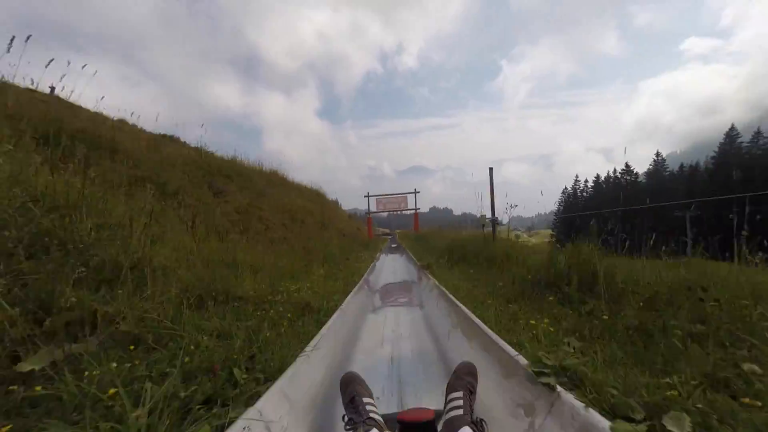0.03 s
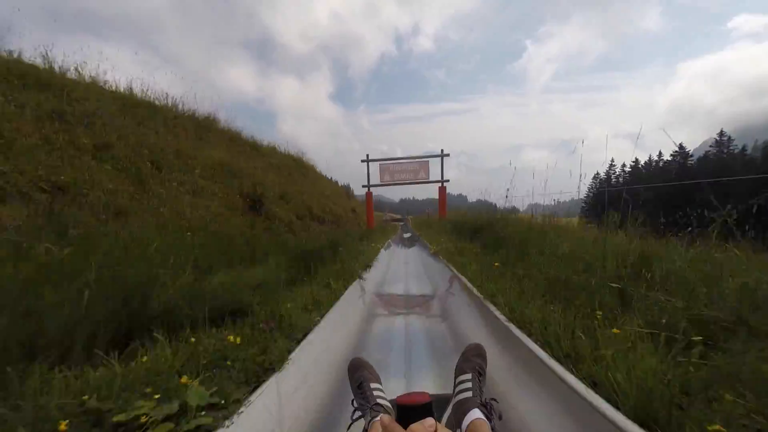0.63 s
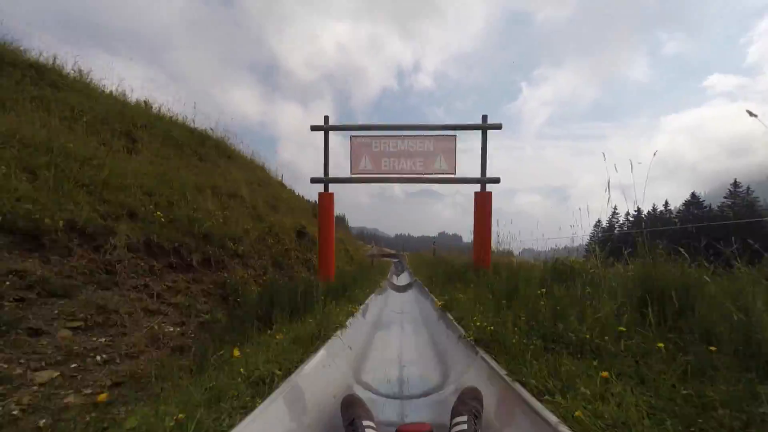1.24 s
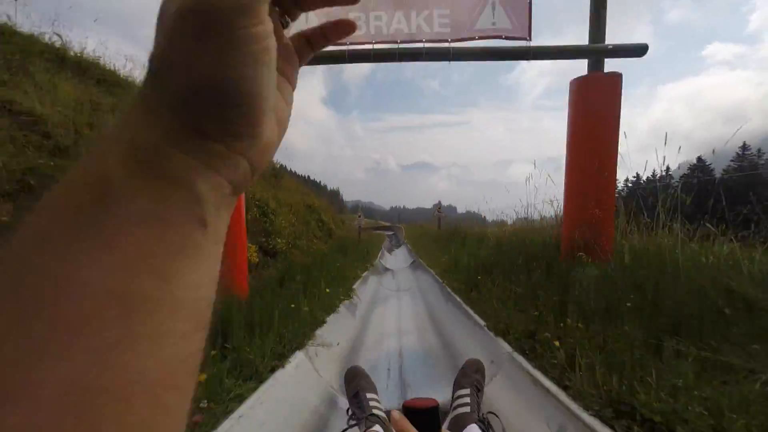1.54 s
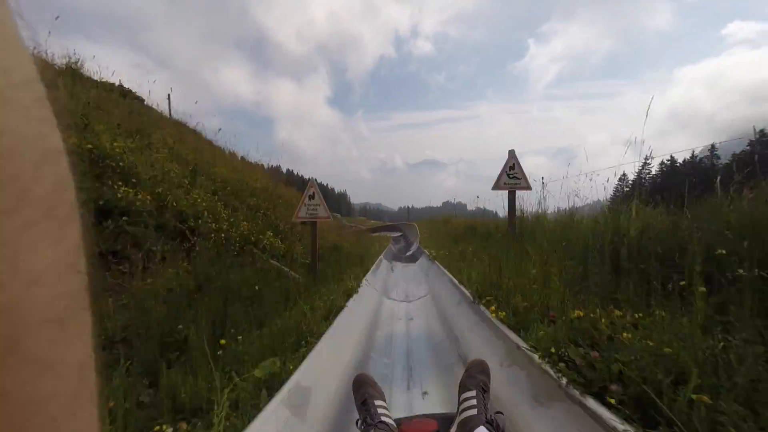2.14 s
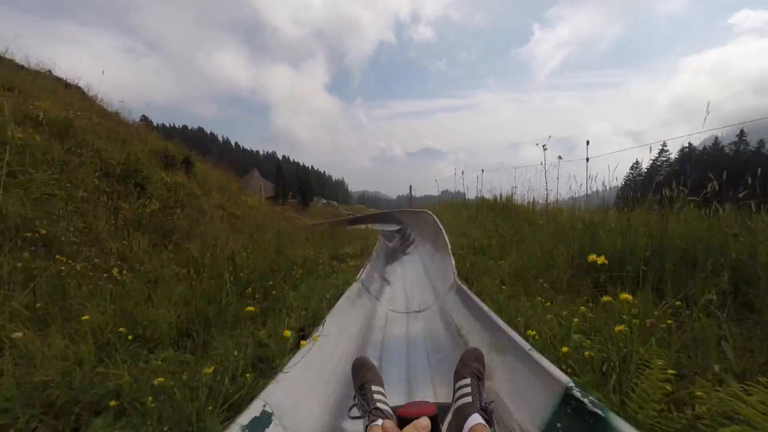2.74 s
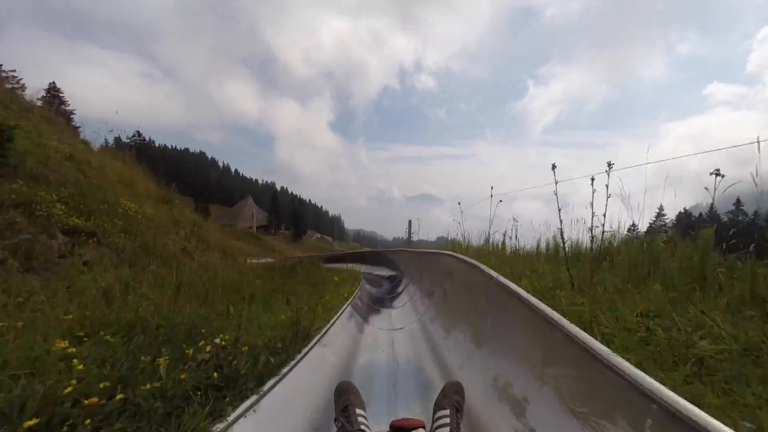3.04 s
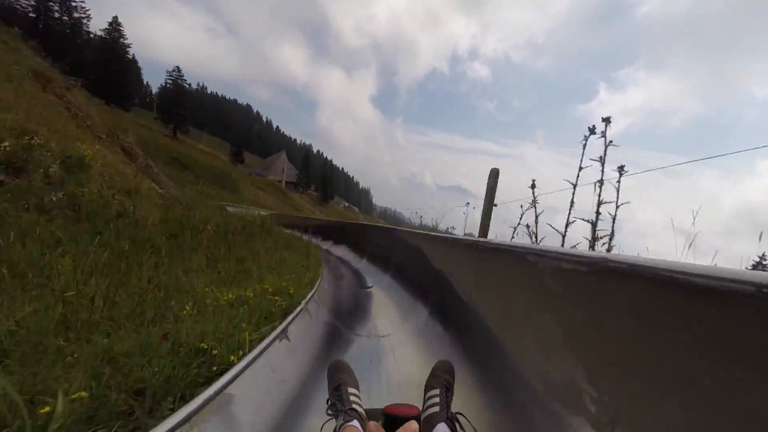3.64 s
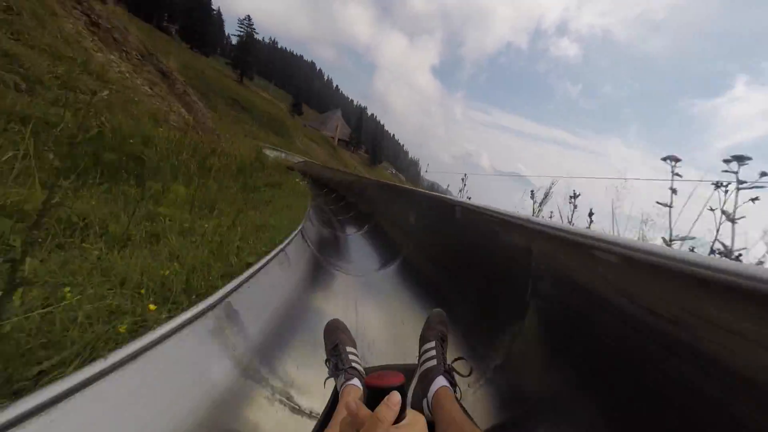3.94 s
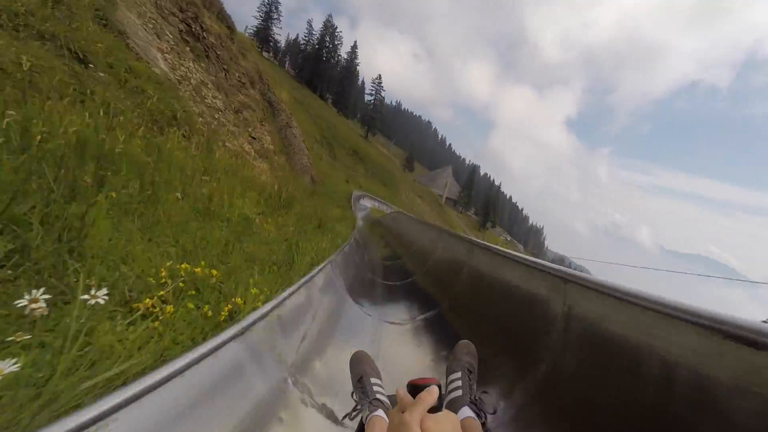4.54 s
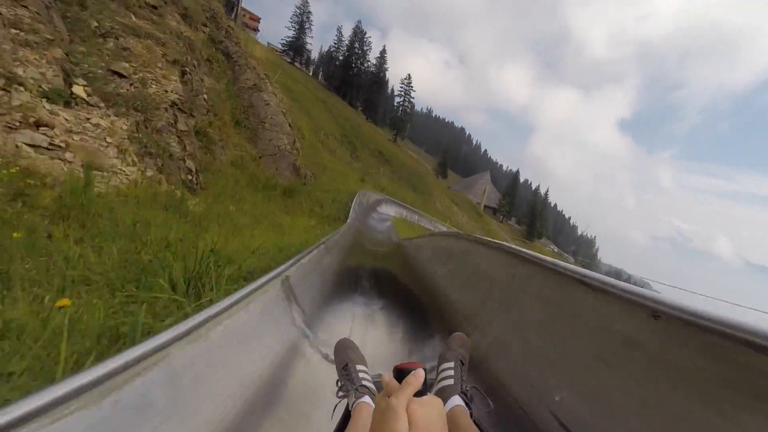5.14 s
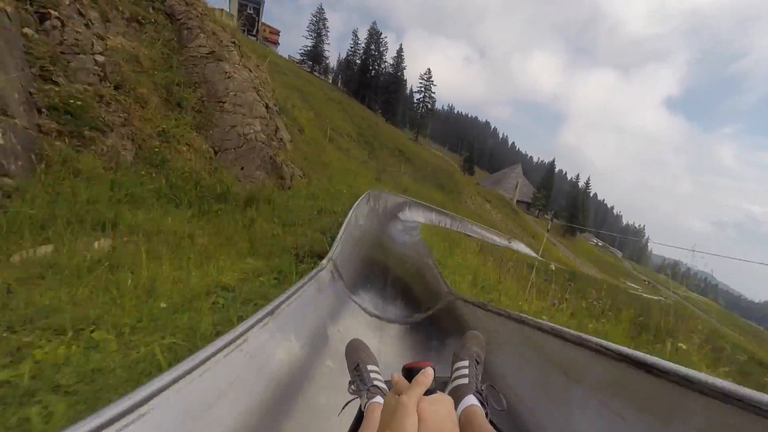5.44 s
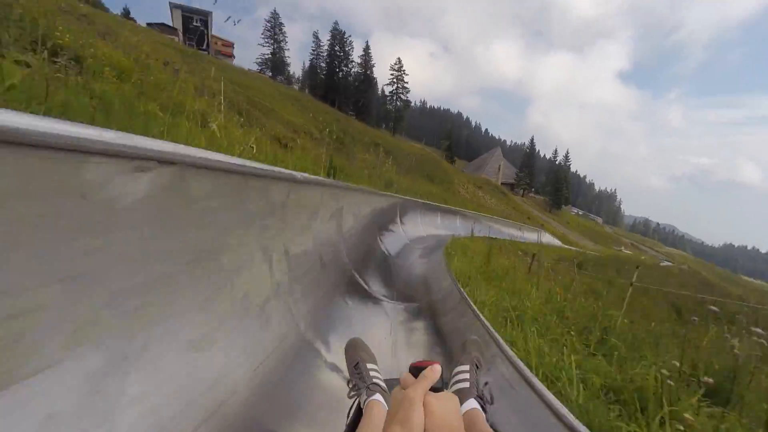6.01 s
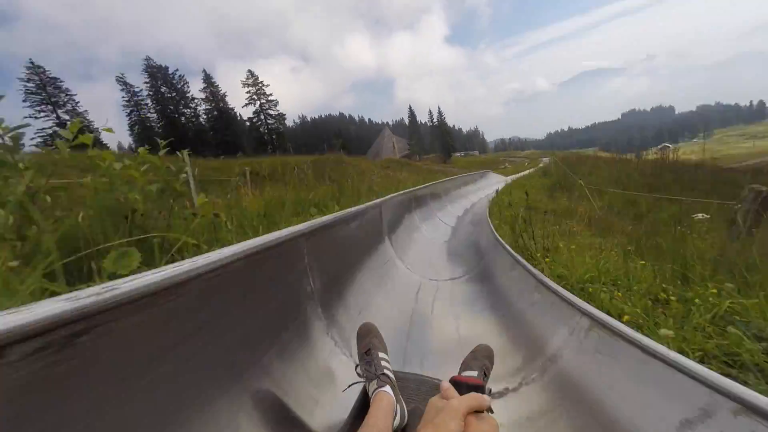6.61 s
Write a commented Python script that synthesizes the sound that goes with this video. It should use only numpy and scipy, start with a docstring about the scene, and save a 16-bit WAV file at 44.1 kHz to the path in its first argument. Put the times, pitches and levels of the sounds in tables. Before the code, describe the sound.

A jolt opens straight into the roar of a sled's wheels on a sheet steel trough, heard close from the rider's seat in open air. A deep rumble and gritty hiss continue at a fairly even level throughout. For the first three seconds the wheels knock over joints about four times a second, slowing slightly after two seconds. Each bump brings a low thump, often with a hollow clack, and hard jolts rattle loose parts at about 0.3, 1, 1.3, 2.1 and 2.9 seconds. Small metal clinks and pings are scattered among them. From about 3.5 seconds the bumps become irregular as the sled lurches through curves. Faint, thin scrapes and short chattering skids come between 3.9 and 4.9 seconds. A sharper skid with a metallic ping hits at 5.8 seconds, followed by more clacks and a bright scrape near 6.7 seconds, with the sled still rolling.

```python
"""A jolt and the roar of wheels on sheet steel: a sled runs down a trough, heard from the rider's seat.
The wheels knock over the joints, about four a second at first; each bump rocks the sled on its mounts,
and hard jolts rattle loose parts. It brakes, then lurches through banked curves where the wheels
scrape and chatter and the hollow shell clacks."""
import sys
import numpy as np
from scipy import signal
from scipy.fft import rfft, irfft, next_fast_len
from scipy.io import wavfile
from scipy.ndimage import uniform_filter1d

SR = 44100
rng = np.random.default_rng(int(sys.argv[2]) if len(sys.argv) > 2 else 0)


def unload_audio(sound):
    """Save the sound as a 16-bit wav file, at the path given as the first command line argument."""
    columns = np.transpose(np.atleast_2d(sound))
    # keep every value between -1 and 1, then stretch to whole-number steps
    steps = np.round(np.clip(columns, -1, 1) * 32767)
    wavfile.write(sys.argv[1], SR, steps.astype(np.int16))


N = 298557
TIME_S = np.arange(N) / SR

# steady contact, before each layer's trim: (time [s], roar [dB], grinding hiss [dB], shaking [dB])
ROLLING_LEVELS = [(0.0, -36, -41.5, -33), (0.38, -35, -42.5, -25.5), (0.75, -37.5, -42, -33.5),
                  (1.34, -36, -42, -29), (2.34, -35.5, -42, -31), (2.94, -35.5, -42, -28.5),
                  (3.45, -37.5, -44, -36), (3.69, -33.5, -39.5, -33.5), (4.03, -36, -43.5, -30),
                  (4.51, -35.5, -40, -29.5), (5.26, -34.5, -41, -31), (5.9, -35.5, -41.5, -31),
                  (6.35, -32, -40, -28), (6.77, -37, -41, -27.5)]
# braking run, sets the front-to-rear delay: (time [s], speed [m/s])
SLED_SPEED = [(0, 8.56), (2.0, 7.7), (2.22, 6.2), (2.5, 6.66), (3.05, 6.26), (3.5, 6.3), (4.8, 5.28),
              (6.77, 4.45)]
# trough joints: (time [s], front thud [dB], front tick [dB],
# rear rocking [Hz], rear rocking [dB], rear punch [dB])
TROUGH_JOINTS = [(0.18, -29.5, -51, 46, -22.5, -19), (0.433, -31, -54, 54.2, -19.5, -28),
                 (0.68, -33, -55, 53.7, -18.5, -17.5), (0.944, -29.5, -45.5, 51.4, -18, -19),
                 (1.2, -33, -53, 52.53, -19.5, -17.5), (1.45, -33.5, -46.5, 64.6, -17, -22),
                 (1.712, -33.5, -50.5, 43.6, -19, -19), (1.974, -29.5, -40.5, 50, -19.5, -23.5),
                 (2.215, -33, -60, 44.3, -19, -30), (2.506, -27, -45, 46.4, -18, -29.5),
                 (2.774, -31, -44.5, 46.8, -16.5, -31), (3.04, -33, -45, 54, -26.5, -31.5),
                 (3.52, -36.5, -48, 46, -21.5, -30), (3.747, -38.5, -49.5, 32.7, -20, -32),
                 (4.074, -34.5, -56, 59.4, -32, -38), (4.424, -32.5, -53, 54.7, -22, -58),
                 (4.813, -30.5, -56, 55, -24.5, -34), (5.182, -35.5, -43, 74, -28.5, -25),
                 (6.079, -46, -62, 34.8, -40, -24.5), (6.166, -31.5, -43, 60.1, -24, -29),
                 (6.328, -43, -43, 51.4, -24, -47), (6.586, -31.5, -49, 51.5, -43, -30)]
# landings from hops after fast joints: (time [s], rocking [dB])
HOP_LANDINGS = [(0.327, -16.5), (0.795, -19), (1.09, -18.5), (1.344, -20.5), (1.557, -17), (1.828, -20),
                (2.109, -25), (2.888, -20.5), (3.175, -22.5)]
# low thumps with a brief rattle, from rebounds on the straight and lurches in the curves:
# (time [s], rocking [Hz], rocking [dB], punch [dB], rattle [dB])
SLED_JOLTS = [(0, 54.5, -18, -22.5, -36.5), (0.077, 62.2, -49, -38, -44), (0.528, 58.6, -20.5, -20, -66),
              (2.351, 49, -15, -29, -54), (3.487, 55.4, -24.5, -28.5, -54), (3.534, 54.3, -21, -49, -46),
              (3.647, 46, -29, -39, -54), (3.714, 37, -18.5, -35, -54), (3.88, 52.5, -19.5, -42, -52),
              (4.001, 50, -22, -33, -75), (4.222, 58, -25, -44, -69), (4.339, 51.6, -26.5, -34, -41),
              (4.661, 65, -25.5, -39, -40.5), (4.7, 45, -21.5, -38, -52), (4.813, 49, -23.5, -25, -44),
              (4.933, 58, -33, -28, -44.5), (5.155, 40.75, -24.5, -29, -66), (5.045, 62, -23.5, -28, -48),
              (5.322, 76.4, -28, -27, -45.5), (5.403, 45.1, -40, -24.5, -47.5),
              (5.446, 62.6, -28.5, -30, -49), (5.773, 56.6, -22, -22.5, -41), (5.84, 53.7, -31, -36, -53),
              (5.964, 53.7, -36, -34, -45), (6.131, 64.4, -28, -26.5, -53), (6.309, 55.05, -28, -35, -51),
              (6.369, 66, -38, -20, -44.5), (6.392, 59.3, -27, -33, -52), (6.71, 54.96, -44, -22.5, -43.5),
              (6.743, 53.6, -39, -41, -43.5)]
# loose parts after hard jolts: (time [s], length [s], body [dB], jingle [dB])
HARD_RATTLES = [(0.276, 0.039, -26, -32.5), (1.033, 0.021, -26, -34.5), (1.075, 0.015, -28, -42),
                (1.288, 0.032, -37, -38), (1.322, 0.021, -28, -35.5), (1.548, 0.029, -30.5, -35),
                (1.79, 0.024, -28, -39), (2.072, 0.03, -25, -30.5), (2.603, 0.03, -32.5, -41.5),
                (2.878, 0.04, -27.5, -36.5), (2.923, 0.013, -31.5, -40), (3.543, 0.016, -36, -34.5),
                (4.525, 0.024, -33, -45), (4.91, 0.046, -43.5, -42), (6.26, 0.062, -33, -39)]
# shell slams down or into the wall: (time [s], pitch [Hz], hollow ring [dB], click [dB])
SHELL_CLACKS = [(0.185, 516, -33, -52), (0.675, 523.5, -28, -41), (0.277, 750, -23, -31),
                (0.312, 776, -23.5, -33), (1.036, 650, -26, -42), (1.078, 756, -22, -36.5),
                (1.276, 480, -25, -39), (1.294, 730, -21.5, -37.5), (1.795, 830, -27, -34.5),
                (2.089, 607, -24.5, -40), (2.216, 610, -27, -45), (2.509, 375, -27, -43),
                (2.881, 457, -23, -36.5), (2.903, 720, -21.5, -40), (3.04, 874, -22.5, -45),
                (3.068, 890, -35, -58), (3.18, 500, -29, -38.5), (3.518, 798, -25, -40.5),
                (3.625, 600, -34, -38.5), (3.751, 510, -27, -44), (4.074, 630, -27, -58),
                (4.198, 1000, -27.5, -48), (4.368, 876, -29, -54), (4.428, 487, -23, -50),
                (4.71, 1300, -32.5, -37.5), (4.81, 504, -22, -40), (4.838, 1160, -32, -53),
                (5.184, 607, -27.5, -39), (5.456, 610, -31.5, -37), (5.832, 1140, -31, -30),
                (6.084, 970, -31, -39), (6.167, 530, -23, -35), (6.287, 560, -25, -37),
                (6.331, 570, -33, -36), (6.4, 894, -23.5, -35.5), (6.593, 970, -27, -36),
                (6.716, 800, -29, -57), (6.751, 1610, -29.5, -40)]
# small fitting hits the frame: (time [s], snap [dB], ring [dB])
FITTING_CLINKS = [(1.697, -49, -59), (1.792, -38.5, -55), (1.981, -37, -56), (2.098, -32, -57),
                  (2.507, -38, -47), (3.042, -37, -55), (3.623, -38.5, -60), (3.802, -38.5, -67),
                  (5.062, -35, -72), (5.303, -35.5, -57), (6.178, -45, -54)]
# brief metal rings and squeaks: (time [s], pitch [Hz], t60 [s], level [dB])
METAL_PINGS = [(1.568, 4240, 0.22, -59), (2.099, 4380, 0.28, -53), (2.523, 1690, 0.13, -39),
               (2.777, 2390, 0.068, -44), (3.041, 1380, 0.033, -39), (3.269, 2020, 0.014, -45.5),
               (3.626, 2400, 0.037, -43.5), (4.011, 2330, 0.26, -53), (4.197, 1242, 0.022, -46),
               (5.792, 2308, 0.034, -40), (5.832, 1410, 0.026, -38), (5.836, 4400, 0.051, -42)]
# sideways wheel slips: (time [s], length [s], slip rate [Hz], level [dB])
WHEEL_SKIDS = [(4.187, 0.033, 470, -43.5), (4.35, 0.067, 600, -46), (4.578, 0.02, 450, -38.5),
               (5.819, 0.033, 580, -34)]
# rims on steel: (time [s], length [s], band centre [Hz], level [dB])
RIM_SCRAPES = [(0.473, 0.052, 6800, -54.5), (2.218, 0.039, 6400, -55), (3.171, 0.077, 6000, -52.5),
               (3.871, 0.2, 6400, -60.5), (4.158, 0.05, 5800, -53), (4.267, 0.14, 6300, -62),
               (4.41, 0.24, 6450, -60), (4.666, 0.12, 6660, -59), (4.794, 0.12, 6640, -60.5),
               (6.125, 0.13, 5500, -53), (6.729, 0.13, 6000, -45)]

# shell and wheel resonances, negative lift is a notch: (centre [Hz], width [Hz], lift [dB])
SLED_MODES = [(491, 190, 13.5), (859, 313, 8), (1462, 440, 5), (1964, 37, 6.5), (2324, 135, 7.5),
              (3156, 79, 4), (3400, 150, 3), (4190, 20, 8.5), (4950, 136, -11.5), (5350, 550, 2.5),
              (6400, 470, 2)]
# hollow shell modes: (ratio to clack pitch [1], level [dB], t60 [s])
SHELL_MODES = [(0.66, 3.5, 0.032), (0.85, -1.5, 0.076), (1, 4, 0.026), (1.27, -13, 0.089), (1.7, -28, 0.03)]
# fitting modes: (frequency [Hz], level [dB], t60 [s])
FITTING_MODES = [(7160, 2, 0.03), (7400, 8, 0.08), (9500, 6, 0.04), (11100, 1, .04), (13000, -4, .025)]

# spectra of rolling, knocks and loose parts: (frequency [Hz], relative density [dB])
ROAR_SPECTRUM = [(60, -18), (180, -2.5), (250, 6), (340, -2.5), (500, -4.5), (750, -7.5), (1100, -8),
                 (2200, -9.5), (3200, -23), (6000, -41), (15000, -92)]
HISS_SPECTRUM = [(500, -21), (1800, 2.5), (3000, 1.5), (4300, 1), (5600, -4), (7200, -5), (8200, -14.5),
                 (10500, -16), (12500, -25.5), (15000, -27)]
RUMBLE_SPECTRUM = [(10, -32), (22, 5), (32, 1), (40, -0.5), (55, -0.5), (75, -5), (110, -11.5), (170, -12),
                   (250, -24.5), (450, -41), (1500, -100)]
THUD_SPECTRUM = [(60, 3.5), (180, 7), (260, 6), (380, 0), (520, -4.5), (720, -5.5), (1100, -16.5),
                 (2000, -16), (3500, -29), (9000, -44)]
CLANG_SPECTRUM = [(300, -0.5), (700, -10.5), (1400, 0), (2200, -5.5), (3500, -8.5), (6000, -16.5),
                  (12000, -58)]
JINGLE_SPECTRUM = [(400, -62), (1200, 5), (2200, 6.5), (3300, 6.5), (4500, 4.5), (7200, 0.5), (8400, -11.5),
                   (11000, -14), (13000, -30), (15000, -34)]
SNAP_SPECTRUM = [(1000, 7), (4000, 12.5), (7000, 11), (9000, -2), (13000, -8), (14800, -27)]
CLATTER_SPECTRUM = [(120, -2), (260, 2.5), (370, -3.5), (520, -4), (780, -3.5), (1100, -14), (2200, -18.5),
                    (4500, -32)]
# faint steady tones: (frequency [Hz], level [dB])
WHINE_TONES = [(8781, -80), (11718, -83.5), (14625, -85.5)]


def rolling(roar_trim_db=-3.5, hiss_trim_db=-6.5):
    """Wheels drum over the steel's grain; roar and hiss follow their fluttering load."""
    times_s, roar_db, hiss_db, _ = np.transpose(ROLLING_LEVELS)
    load = drift(hz=33.0)
    roar = steel_grain(ROAR_SPECTRUM, per_s=1500, spread_db=2.5, patchy_db=3.5, change_hz=10.5)
    hiss = steel_grain(HISS_SPECTRUM, per_s=3000, spread_db=0.5, patchy_db=2.0, change_hz=23.3)
    flutter_db = 2.24 * load + drift(hz=90.5)
    roar *= gain_of(np.interp(TIME_S, times_s, roar_db) + roar_trim_db + flutter_db)
    hiss *= gain_of(np.interp(TIME_S, times_s, hiss_db) + hiss_trim_db + 2.5 * load)
    return roar + hiss


def steel_grain(spectrum, per_s, spread_db, patchy_db, change_hz):
    """Tiny impacts whose colour shifts as new spots pass under the wheels."""
    spots = [signal.oaconvolve(contacts(N, per_s, spread_db), response(spectrum, patchy_db))[:N]
             for _ in range(8)]
    shares = np.array([drift(change_hz) for _ in spots])
    blend = sum(evened(spot) * share for spot, share in zip(spots, shares))
    return evened(blend / np.linalg.norm(shares, axis=0))


def ride(wheelbase_m=0.55, rear_thud_db=-0.5, rear_tick_db=-4.5, landing_hz=53.8, landing_punch_db=-11.5):
    """Knock and bump rows: both axles knock at a joint; rear axle, landings and jolts bump the sled."""
    knock_rows, bump_rows = [], []
    for at_s, thud_db, tick_db, rock_hz, rock_db, punch_db in TROUGH_JOINTS:
        rear_s = at_s + wheelbase_m / np.interp(at_s, *np.transpose(SLED_SPEED))
        knock_rows.append((at_s, thud_db, tick_db))
        knock_rows.append((rear_s, thud_db + rear_thud_db, tick_db + rear_tick_db))
        bump_rows.append((rear_s, rock_hz, rock_db, punch_db))
    bump_rows += [(at_s, landing_hz, db, db + landing_punch_db) for at_s, db in HOP_LANDINGS]
    bump_rows += [jolt[:4] for jolt in SLED_JOLTS]
    return knock_rows, bump_rows


def bumps(rows, rock_t60_s=0.17, rise_s=0.014, punch_hz=126, punch_t60_s=0.12):
    """A jolt punches the seat; the sled rocks on its mounts for a few cycles."""
    out, t = np.zeros(N), np.arange(SR // 3) / SR
    for at_s, rock_hz, rock_db, punch_db in rows:
        rock = -np.sin(2 * np.pi * rock_hz * t) * attack(t, rise_s) * decay(t, rock_t60_s)
        seat_hz = punch_hz * np.exp(0.098 * rng.standard_normal())
        seat = np.sin(2 * np.pi * seat_hz * 0.823 * t) - 0.84 * np.sin(2 * np.pi * seat_hz * 1.251 * t)
        add(out, at_s, sized(rock, rock_db, span_s=0.07))
        add(out, at_s, sized(seat * decay(t, punch_t60_s), punch_db, span_s=0.033))
    return out


def knocks(rows, thud_t60_s=0.23, tick_t60_s=0.17, rise_s=0.00015, clang_offset_db=-7):
    """A wheel drops over an edge: thud in the shell, clang in the trough, tick at the contact."""
    out, t = np.zeros(N), np.arange(SR // 4) / SR
    for at_s, thud_db, tick_db in rows:
        thud_ir, clang_ir, tick_ir = (response(spectrum, patchy_db=4.0)
                                      for spectrum in (THUD_SPECTRUM, CLANG_SPECTRUM, JINGLE_SPECTRUM))
        blow, crunch = rng.standard_normal((2, len(t))) * attack(t, rise_s)
        thud = signal.fftconvolve(blow * decay(t, thud_t60_s), thud_ir)
        clang = signal.fftconvolve(sheet_ring(t), clang_ir)
        tick = signal.fftconvolve(crunch * decay(t, tick_t60_s), tick_ir)
        add(out, at_s, sized(thud, thud_db, span_s=0.056))
        add(out, at_s, sized(clang, (thud_db + tick_db) / 2 + clang_offset_db, span_s=0.2))
        add(out, at_s, sized(tick, tick_db, span_s=0.053))
    return out


def sheet_ring(t, ref_hz=1500, ref_t60_s=0.28, ref_travel_s=0.016):
    """Bending waves in steel: the high ones arrive first and die first."""
    out = np.zeros(len(t))
    for hz in np.geomspace(600, 7000, 8):
        band = bandpass(rng.standard_normal(len(t)), hz / 1.2, hz * 1.2)
        slowness = np.sqrt(ref_hz / hz)
        out += band * attack(t, ref_travel_s * slowness ** 2) * decay(t, ref_t60_s * slowness)
    return out


def clacks(click_s=0.0047):
    """The shell slams: a hard click, then a hollow ring."""
    out, t = np.zeros(N), np.arange(SR // 30) / SR
    for at_s, hz, hollow_db, click_db in SHELL_CLACKS:
        contact = burst(t, click_s)
        modes = [(hz * ratio * np.exp(0.089 * rng.standard_normal()), db, t60_s)
                 for ratio, db, t60_s in SHELL_MODES]
        hollow = ring(modes, contact_s=0.005)
        click = signal.fftconvolve(contact, response(JINGLE_SPECTRUM, patchy_db=4.5))
        add(out, at_s, sized(click, click_db, span_s=0.0087))
        add(out, at_s, sized(hollow, hollow_db, span_s=0.0068))
    return out


def shakes(jolt_lag_s=0.006, jolt_length_s=0.021, skid_offset_db=-4.5, body_lift_db=9):
    """Rattle rows: jolts and skids shake the loose parts."""
    jolted = [(at_s + jolt_lag_s, jolt_length_s, db + body_lift_db, db)
              for at_s, _, _, _, db in SLED_JOLTS]
    skidded = [(at_s, length_s, db + skid_offset_db + body_lift_db, db + skid_offset_db)
               for at_s, length_s, _, db in WHEEL_SKIDS]
    return list(HARD_RATTLES) + jolted + skidded


def rattles(rows, clump_db=2.5, rise_s=0.00054, settle_s=0.007):
    """Loose parts crunch against the frame while shaken, then settle."""
    out, t = np.zeros(N), np.arange(SR // 7) / SR
    for at_s, length_s, body_db, jingle_db in rows:
        jingle_ir = response(SNAP_SPECTRUM, patchy_db=6.0)
        body_ir = response(CLATTER_SPECTRUM, patchy_db=3.0)
        envelope = attack(t, rise_s) * np.exp(-np.maximum(t - length_s, 0) / settle_s)
        clumps = gain_of(clump_db * wobble(t, window_samples=200))
        clatter = envelope * clumps * contacts(len(t), per_s=3500, spread_db=2.5)
        add(out, at_s, sized(signal.fftconvolve(clatter, jingle_ir), jingle_db, length_s))
        add(out, at_s, sized(signal.fftconvolve(clatter, body_ir), body_db, length_s))
    return out


def clinks_and_pings(snap_s=0.0048):
    """A metal fitting snaps on the frame and rings; single pings top the rattle."""
    out, t = np.zeros(N), np.arange(SR // 30) / SR
    for at_s, snap_db, ring_db in FITTING_CLINKS:
        snap = signal.fftconvolve(burst(t, snap_s), response(SNAP_SPECTRUM))
        add(out, at_s, sized(snap, snap_db, span_s=0.0062))
        add(out, at_s, sized(ring(FITTING_MODES), ring_db, span_s=0.027))
    for at_s, hz, t60_s, db in METAL_PINGS:
        add(out, at_s, sized(ring([(hz, 0, t60_s)]), db, span_s=0.053))
    return out


def skids(edge_db=0.5, jitter_cycles=0.26):
    """Stick-slip: a quick row of jerks buzzes through the shell."""
    out = np.zeros(N)
    for at_s, length_s, slip_hz, db in WHEEL_SKIDS:
        t = np.arange(int(length_s * SR)) / SR
        cycles = t * slip_hz + jitter_cycles * wobble(t, window_samples=90)
        slip_count = np.floor(np.maximum.accumulate(cycles))
        jerks = np.diff(slip_count, prepend=0) * np.sin(np.pi * t / length_s)
        for spectrum, level_db in (THUD_SPECTRUM, db), (JINGLE_SPECTRUM, db + edge_db):
            add(out, at_s, sized(signal.fftconvolve(jerks, response(spectrum)), level_db, length_s))
    return out


def scrapes(width_hz=1400):
    """Bright, gritty friction swells and fades as a rim leans on the wall."""
    out = np.zeros(N)
    for at_s, length_s, hz, db in RIM_SCRAPES:
        t = np.arange(int(length_s * SR)) / SR
        grains = contacts(len(t), per_s=3500, spread_db=2.5) * np.sin(np.pi * t / length_s)
        friction = bandpass(grains, hz - width_hz / 2, hz + width_hz / 2)
        add(out, at_s, sized(friction, db, length_s))
    return out


def rumble(trim_db=2.87):
    """The uneven trough keeps the sled shaking."""
    shaking = evened(signal.oaconvolve(rng.standard_normal(N), response(RUMBLE_SPECTRUM))[:N])
    times_s, _, _, shaking_db = np.transpose(ROLLING_LEVELS)
    return shaking * gain_of(np.interp(TIME_S, times_s, shaking_db) + trim_db + 1.1 * drift(hz=13))


def grit(trim_db=-10, decay_cycles=5.7, tilt_db_per_octave=-5, pitches=24):
    """Specks and scratches under the wheels each tap a short resonance."""
    out, t = np.zeros(N), np.arange(SR // 12) / SR
    for hz in np.geomspace(420, 3200, pitches) * np.exp(0.19 * rng.standard_normal(pitches)):
        tap = np.sin(2 * np.pi * hz * t) * np.exp(-hz * t / decay_cycles)
        taps = signal.oaconvolve(contacts(N, per_s=4, spread_db=-1.5), tap)[:N]
        out += evened(taps) * gain_of(tilt_db_per_octave * np.log2(hz / 1000))
    times_s, roar_db, _, _ = np.transpose(ROLLING_LEVELS)
    return evened(out) * gain_of(np.interp(TIME_S, times_s, roar_db) + trim_db)


def response(spectrum, patchy_db=0, size=8192):
    """Minimum-phase impulse response with the sled's modes; each struck spot favours other bands."""
    hz = np.fft.rfftfreq(size, 1 / SR)
    points_hz, points_db = np.transpose(spectrum)
    db = np.interp(np.log(hz + 1), np.log(points_hz), points_db)
    db += sum(lift / (1 + (2 * (hz - centre) / width) ** 2) for centre, width, lift in SLED_MODES)
    patches = np.interp(hz, np.geomspace(100, 16000, 70), rng.standard_normal(70))
    db += patchy_db * patches / np.sqrt(1 + (hz / 5000) ** 2)  # high modes overlap and even out
    log_gain = np.log(gain_of(np.r_[db, db[-2:0:-1]]))
    return np.fft.ifft(np.exp(np.conj(signal.hilbert(log_gain)))).real[:size // 2]


def ring(modes, contact_s=0.00095):
    """Dying modes set off by a short bouncing contact."""
    t = np.arange(SR // 4) / SR
    contact = burst(t, contact_s)
    return sum(gain_of(db) * evened(signal.fftconvolve(contact, np.sin(2 * np.pi * hz * t) * decay(t, t60)))
               for hz, db, t60 in modes)


def contacts(samples, per_s, spread_db):
    """Tiny impacts of random time, sign and size."""
    hit = rng.random(samples) < per_s / SR
    sign = rng.choice([-1, 1], samples)
    return hit * sign * gain_of(spread_db * np.minimum(rng.exponential(1, samples), 4))


def drift(hz):
    """Smooth noise, rms 1, rolling off above hz."""
    size = next_fast_len(N, True)
    low_pass = np.exp(-(np.fft.rfftfreq(size, 1 / SR) / hz) ** 2)
    return evened(irfft(rfft(rng.standard_normal(size)) * low_pass, size)[:N])


def wobble(t, window_samples):
    return evened(uniform_filter1d(rng.standard_normal(len(t)), size=window_samples))


def burst(t, decay_s):
    return rng.standard_normal(len(t)) * np.exp(-t / decay_s)


def attack(t, rise_s):
    return 1 - np.exp(-t / rise_s)


def decay(t, t60_s):
    return gain_of(-60 * t / t60_s)


def bandpass(x, low_hz, high_hz):
    return signal.sosfilt(signal.butter(2, [low_hz, high_hz], "band", fs=SR, output="sos"), x)


def gain_of(db):
    return 10 ** (np.asarray(db) / 20)


def evened(x):
    """Scales to rms 1."""
    return x / np.sqrt(np.mean(x ** 2) + 1e-20)


def sized(x, db, span_s):
    """Scales to the energy of db held for span_s."""
    return gain_of(db) * x * np.sqrt(span_s * SR / (np.sum(x ** 2) + 1e-20))


def add(mix, at_s, sound):
    part = mix[max(round(at_s * SR), 0):][:len(sound)]
    part += sound[:len(part)]


def scene():
    """All sources reach the rider directly, in open air; mono."""
    knock_rows, bump_rows = ride()
    steady = rolling() + grit() + rumble()
    impacts = bumps(bump_rows) + knocks(knock_rows) + rattles(shakes()) + clacks() + clinks_and_pings()
    return (steady + impacts + skids() + scrapes())[None]


def record(dry, cutoff_hz=15200):
    """Adds a faint high whine and limits the band."""
    whine = sum(gain_of(db) * np.sqrt(2) * np.sin(2 * np.pi * hz * TIME_S) for hz, db in WHINE_TONES)
    low_pass = signal.firwin(511, cutoff_hz, window=("kaiser", 9), fs=SR)
    return signal.oaconvolve(dry + whine, low_pass[None], "same")


dry = scene()
out = record(dry)
unload_audio(out)
```